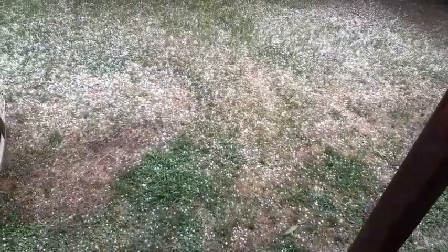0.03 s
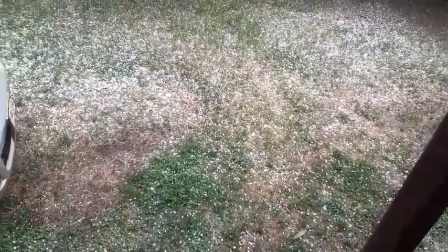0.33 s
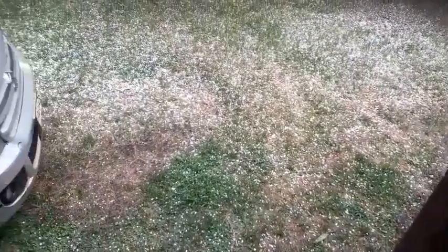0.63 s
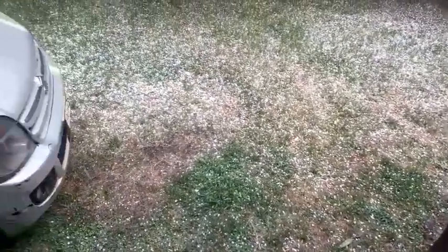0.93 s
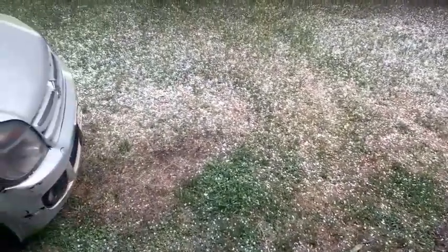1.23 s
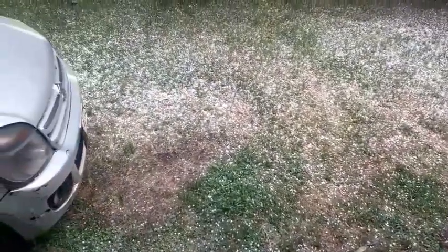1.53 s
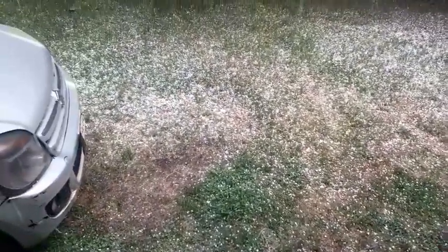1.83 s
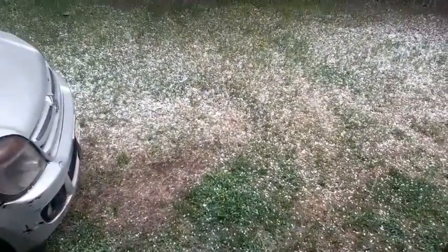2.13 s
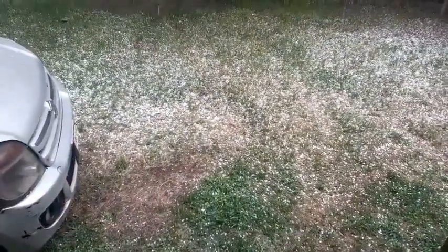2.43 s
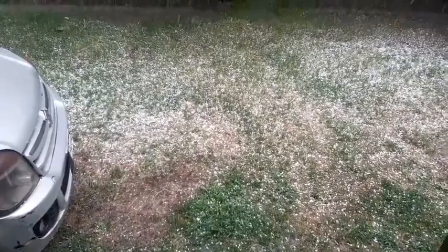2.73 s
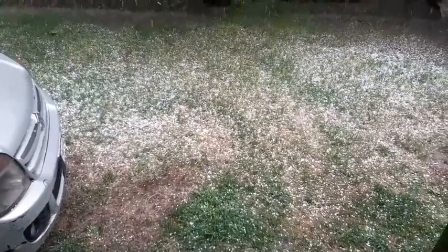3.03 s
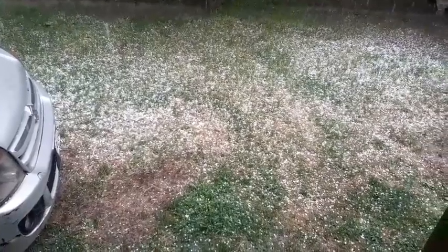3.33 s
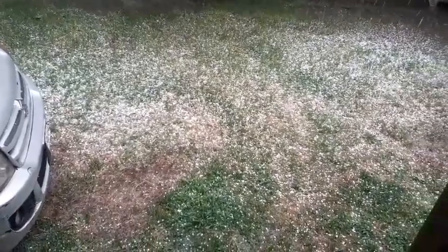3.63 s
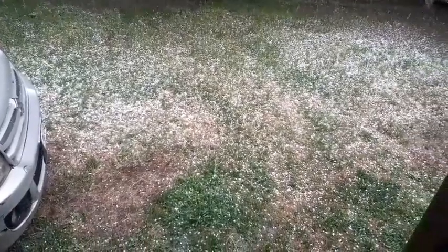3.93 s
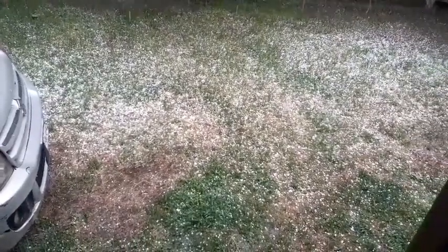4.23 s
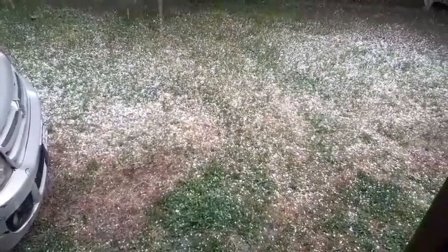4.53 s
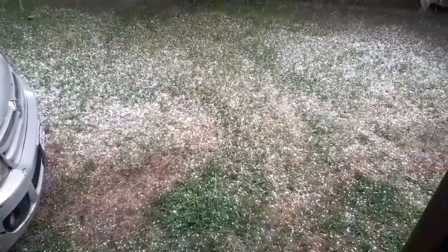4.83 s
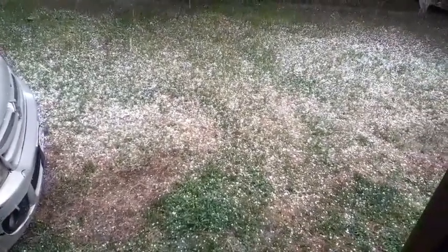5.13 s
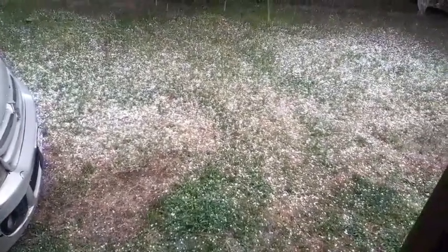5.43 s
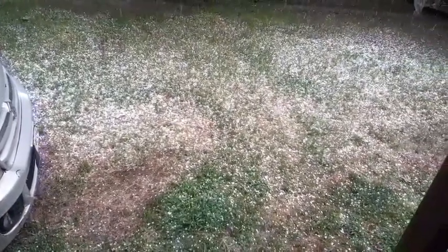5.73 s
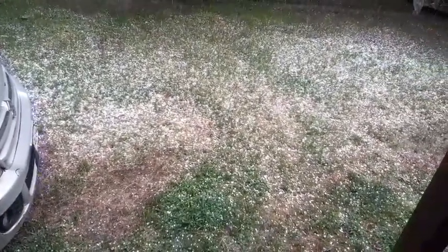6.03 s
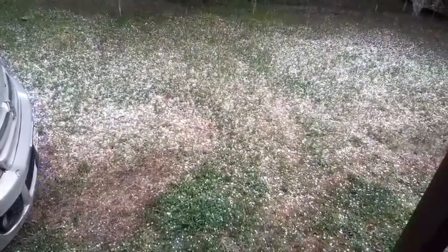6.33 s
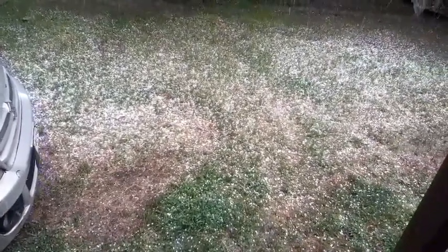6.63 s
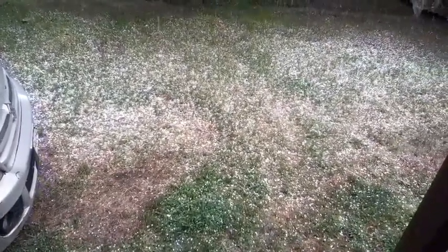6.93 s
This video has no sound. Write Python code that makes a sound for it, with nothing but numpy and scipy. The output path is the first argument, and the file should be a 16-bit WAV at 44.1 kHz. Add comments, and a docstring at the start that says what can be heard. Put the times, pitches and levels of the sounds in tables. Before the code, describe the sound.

Hail and rain pour on a grassy yard in a dense, steady roar, heard from under an open shelter beside a parked car. Small stones drum on the roof, and ice ticks and clinks on the ground and car. Big stones hit overhead with hollow knocks and gritty crashes for three seconds, pause briefly, land in a second bunch, thin out, then return near the end.

```python
"""Hail and rain pour on a yard and on the roof of an open shelter beside a parked car.
From the start, countless far stones merge into a roar while nearer ones drum, tick and clink.
For three seconds big stones keep hitting the roof: whole ones knock hollowly, others burst with a crash.
After a short lull a second bunch lands. The big hits thin out after five seconds,
then a last bunch falls near the end, at about seven seconds."""
import sys
import numpy as np
from scipy import signal
from scipy.io import wavfile
from scipy.ndimage import uniform_filter1d

SR = 44100
rng = np.random.default_rng(int(sys.argv[2]) if len(sys.argv) > 2 else 0)


def int16_out(signal):
    """Quantize to a 16-bit WAV file."""
    q = np.round(np.clip(np.atleast_2d(signal).T, -1, 1) * 32767)
    wavfile.write(sys.argv[1], SR, q.astype(np.int16))


N = 312669

# Levels are relative. pan is left minus right; t60 is the time a ring takes to fade by 60 dB.
# how strong each sound is from low to high: f/Hz, level/dB
ROAR_TONE = [(20, -54), (70, -27), (125, -10.5), (165, -11), (260, -5), (410, -8.5), (540, -2.5),
             (680, -3.5), (790, -0.5), (1130, -3.5), (1420, -2), (1750, -4.4), (2400, -6), (3250, -10.5),
             (3800, -10.5), (5400, -14), (6700, -14), (7400, -15.5), (9200, -18), (12300, -18),
             (15500, -29)]
DRUM_TONE = [(30, -54), (100, -24), (260, -8), (400, -10.5), (550, -4), (770, -1), (900, 0.5), (1100, -7.5),
             (2300, -11.5), (4000, -18), (9000, -36), (15000, -41)]
ICE_TONE = [(500, -14), (2000, -5), (4000, -5.5), (7000, 3), (9000, -0.5), (12500, 1), (15500, -9)]
CRASH_TONE = [(200, -18), (900, 4.5), (2000, -0.5), (2900, 5), (3700, 0), (4500, -2), (5600, -2),
              (7000, -3), (9200, -10), (12500, -10), (15500, -22)]
THUD_TONE = [(50, -29), (130, -6), (280, -4), (420, -3.5), (700, -6), (1500, -2), (4000, -46)]
# how alike the roar is on the left and right: f/Hz, likeness (1 or more means the same)
ROAR_LIKENESS = [(60, 1.5), (130, 1), (290, 0.95), (640, 0.77), (1000, 0), (1410, -0.5), (2200, 0.5),
                 (3100, -0.06), (6800, 0)]
# which side the roar leans to: f/Hz, pan/dB
ROAR_PAN = [(60, -1.0), (110, -0.5), (200, -0.5), (380, -1.4), (700, 1.5), (1290, 0), (2380, -0.5),
            (4400, -3), (8120, -2.0), (15000, 0)]
# slow swell of the roof's drumming and of the yard's hiss: t/s, level/dB
ROOF_SWELL = [(0, 3), (0.4, 0.5), (0.85, -0.5), (1.35, 1), (1.8, -1.3), (2.25, -0.5), (3.2, -1),
              (3.95, 0.6), (4.35, -0.5), (4.6, 1.5), (4.8, -0.5), (5.35, 0.5), (5.8, 0.3), (6.1, 0),
              (6.5, 1.5), (7.09, 0.3)]
YARD_SWELL = [(0, 0.021), (1.3, 0.073), (1.85, -0.3), (2.2, 0.063), (3.2, -0.69), (4.3, 0.39), (4.7, -0.19),
              (5.5, -0.1), (6.15, 0.52), (7.09, -0.73)]
# sharp ticks of ice close by: t/s, level/dB, pan/dB
TICK_HITS = [(0.002, -12, 0), (0.183, -18, -6), (0.457, -15, -4), (0.587, -14, -3), (0.622, -17, -2),
             (0.666, -17, -3), (0.719, -17, -2), (0.801, -18, -7), (0.857, -17, -5), (0.975, -20, -4),
             (1.148, -17, -4), (1.402, -17, -2), (1.912, -17, -6), (2.057, -21, -2), (2.15, -18, 5),
             (2.446, -16, -2), (2.818, -13, -10), (3.523, -15, 0), (3.744, -19, -2), (3.804, -15, -3),
             (4.341, -15, -4), (5.815, -20, -7), (5.947, -13.5, -4), (6.111, -15, -1), (6.201, -14, -5),
             (6.252, -14, -3), (6.689, -17, 2), (6.947, -21, -3), (6.983, -14, -4)]
# stones that ring with a note: t/s, level/dB, f/Hz, pan/dB
PING_HITS = [(0.062, -8, 1940, -2), (0.063, -15, 2440, 3), (0.312, -15, 1695, -7), (0.453, -17, 2040, -4),
             (0.496, -9.5, 1600, -8), (0.591, -18, 1588, -4), (0.800, -22, 3014, -12),
             (0.853, -16, 1815, -2), (0.981, -15, 1750, -2), (1.013, -11, 2020, 0), (1.068, -8, 1501, -3),
             (1.069, -18, 3321, -4), (1.147, -19, 5800, 1), (1.681, -11, 2020, 6), (1.683, -19, 4931, -9),
             (1.705, -20, 6756, -7), (2.456, -15, 1222, -6), (2.482, -14, 1380, -2), (2.597, -17, 1950, 0),
             (2.612, -12, 2580, -4), (2.802, -14.5, 2010, -14), (2.818, -12, 2917, -3),
             (3.818, -12, 1720, -5), (4.098, -7, 1650, -3), (4.542, -13, 1291, -3), (4.625, -13, 1668, -6),
             (4.698, -14, 2170, -12), (4.795, -15, 2100, 1), (4.855, -15, 1320, 0), (4.904, -11, 1860, -6),
             (5.028, -13.5, 2030, -9), (5.51, -16, 3500, 0), (5.795, -14, 1216, -5),
             (5.814, -19, 6368, -10), (5.947, -21, 6450, -12), (6.571, -18, 3757, -12),
             (6.628, -16, 1911, -3), (6.680, -20, 1738, -1), (6.792, -12, 1430, 0), (6.961, -12, 1750, 6)]
# hollow knocks and deep thumps on the roof panels: t/s, level/dB, f/Hz
KNOCK_HITS = [(0.001, -20, 285), (0.096, -16, 770), (0.196, -14, 786), (0.312, -17, 873), (0.385, -12, 900),
              (0.495, -18, 620), (0.602, -8, 681), (0.995, -22, 236), (1.030, -12, 765),
              (1.400, -12.5, 942), (2.064, -19, 258), (2.446, -7.5, 766), (2.479, -19, 931),
              (2.734, -14, 848), (3.537, -13, 780), (3.924, -13, 870), (3.957, -23, 339), (3.985, -17, 870),
              (4.100, -11, 655), (4.508, -12, 760), (4.526, -9, 686), (4.558, -17, 285), (4.587, -17, 360),
              (4.590, -20, 904), (4.610, -15, 746), (4.616, -14, 350), (4.627, -16, 764), (4.647, -20, 678),
              (4.738, -23, 263), (5.367, -16.5, 285), (5.443, -22, 232), (5.745, -14, 790),
              (5.892, -17.5, 298), (6.482, -13, 870), (6.59, -15, 590), (6.63, -16, 946), (6.638, -19, 294),
              (6.762, -15, 650), (6.977, -21, 296)]
# big stones on the roof: t/s, level/dB, thud against crash/dB, pan/dB, time for the pieces to land/s,
# clack level/dB, clack f/Hz
BIG_HITS = [(0.318, -17, -6, 0, .002, -22, 3140), (0.381, -18, 2, -4, .003, -30, 3600),
            (0.492, -19.5, 2, -2, .001, -24, 3482), (0.587, -15.5, -9, -1, .0025, -24, 3460),
            (0.664, -19.5, -3, -6, .0015, -24, 3779), (0.85, -18.5, 0, -2, .002, -30, 3520),
            (0.973, -13, -6, -2.5, 0.0023, -15.5, 3520), (1.127, -18, -11, -3, .002, -22, 3520),
            (1.399, -19.5, -2, -6, .003, -29, 3580), (1.585, -16.5, -10, -3.5, .0036, -26, 3300),
            (1.635, -17, -9, -2, .004, -27, 3100), (1.702, -17, 1, -2, 0.0022, -29, 2971),
            (2.055, -14.5, -2.5, -3, .002, -20, 3601), (2.15, -18, -12, 0, .001, -27, 2987),
            (2.444, -15, -7, -1, .0015, -18, 3560), (2.476, -17.5, 2.5, -3, .002, -26, 3370),
            (2.816, -13.5, -17, -3, .0016, -18, 3466), (3.561, -18, -5, -3, .0028, -22, 3680),
            (3.742, -18.5, 1, 1, .0015, -26, 3500), (3.803, -20, -7, -5, .002, -28, 3300),
            (3.922, -17, -1, 0, .002, -18, 3050), (4.005, -16, -4, -4, .002, -33, 3600),
            (4.137, -15, -12, -1, .003, -22, 3316), (4.507, -13.5, -2.5, -2, 0.0029, -19, 3480),
            (4.585, -22, 3, -3, .003, -28, 3470), (4.853, -17, -3, -3, .0015, -29, 3300),
            (5.946, -18.5, -9, -1, .001, -32, 3470), (6.587, -14, -7, -3.5, 0.0027, -20, 3900),
            (6.658, -14.5, -15, -4, .002, -23, 4000), (6.949, -12.5, -6, -1, 0.0045, -22, 3040)]
# the tones (modes) of a clink, a roof panel and the roof sheet: multiple of the pitch, level/dB, t60/s
CLINK_MODES = [(1, -2, 0.087), (1.13, -6, 0.054), (1.33, -4.5, 0.031), (1.9, -12, .025)]
PANEL_MODES = [(0.87, -9, .14), (1, -3, 0.12), (1.3, -18, .04), (1.85, -16, 0.093)]
SHEET_MODES = [(0.55, -8, .1), (0.86, -6, 0.12), (1, 1, 0.14), (1.08, -1.5, .14), (1.19, -4.5, 0.11),
               (1.68, -10, .09), (1.95, -6, .09)]
# the level dips briefly: t/s, depth/dB, half-width/s
LEVEL_DIPS = [(1.754, 2, 0.032), (2.856, 3, 0.025), (5.98, 3.5, 0.021)]


def gain_of(db):
    """Turns decibels into a number to multiply by."""
    return 10 ** (np.asarray(db) / 20)


def evened(x):
    """Scales a signal to an average strength (rms) of 1."""
    return x / np.sqrt(np.mean(x ** 2) + 1e-20)


def read(points, hz):
    """Looks up a table between its rows, giving each octave equal room."""
    f, value = np.transpose(points)
    return np.interp(np.log(hz + 1), np.log(f + 1), value)


def add(mix, start_s, sound):
    """Mixes a stereo sound in at the given time."""
    part = mix[:, max(round(start_s * SR), 0):][:, :sound.shape[1]]
    part += sound[:, :part.shape[1]]


def panned(pan_db):
    """Left and right gains; above 0 dB the left is louder."""
    return gain_of([[pan_db / 2], [-pan_db / 2]])


def coloured(x, points, size=2048):
    """Shapes the tone with a filter that rings only after a click, so the click starts sharply."""
    log_gain = np.log(gain_of(read(points, abs(np.fft.fftfreq(size, 1 / SR)))))
    response = np.exp(np.conj(signal.hilbert(log_gain)))
    taps = np.fft.ifft(response).real[:size // 2]
    return signal.oaconvolve(x, taps[None] / np.linalg.norm(taps), axes=1)[:, :x.shape[1]]


def centred_bass(x, corner_hz=430):
    """Low sounds have long waves, which reach both microphones alike."""
    mid, side = (x[0] + x[1]) / 2, (x[0] - x[1]) / 2
    side = signal.sosfilt(signal.butter(1, corner_hz, "high", fs=SR, output="sos"), side)
    return np.array([mid + side, mid - side])


def ringing(t60, length_s=.25, rise_s=0.0039):
    """Many tones and echoes blur into stereo noise that builds up quickly and dies away."""
    t = np.arange(int(length_s * SR)) / SR
    return rng.standard_normal((2, len(t))) * (1 - np.exp(-t / rise_s)) * gain_of(-60 * t / t60)


def pitched(ring, hz, sharpness=4):
    """Gives a noisy ring one note and keeps its strength."""
    b, a = signal.iirpeak(hz, sharpness, fs=SR)
    return evened(signal.lfilter(b, a, ring)) * np.std(ring)


def struck(modes, hz, rise_s, phase_spread, length_s=.16):
    """A struck object rings with a few fading tones, out of step at the two microphones."""
    t = np.arange(int(length_s * SR)) / SR
    ratio, mode_db, t60 = np.transpose(modes)[:, :, None]
    phase = 2 * np.pi * rng.random(ratio.shape) + phase_spread * rng.standard_normal((2, len(modes), 1))
    fade = (1 - np.exp(-t / rise_s)) * gain_of(mode_db - 60 * t / t60)
    return (fade * np.sin(2 * np.pi * hz * ratio * t + phase)).sum(1)


def clink(hz, tone_db=-2.5, echo_db=-5, length_s=.07):
    """One stone rings on its own note, and the shelter echoes the note."""
    tone = struck(CLINK_MODES, hz, rise_s=0.0016, phase_spread=1.6, length_s=length_s)
    echo = pitched(ringing(t60=0.066, length_s=length_s), hz)
    return gain_of(tone_db) * tone + gain_of(echo_db) * echo


def impacts(per_s, spread_db, ring_t60, echo_gain, echo_t60, patches=24, max_lag=20):
    """Stones land at random on patches all around; each patch has its own ring, direction and echo."""
    out = np.zeros((2, N))
    strength = gain_of(spread_db * np.minimum(rng.exponential(1, N), 3))
    blows = strength * (rng.random(N) < per_s / SR)
    patch = rng.integers(0, patches, N)
    for k, lag in enumerate(np.linspace(-max_lag, max_lag, patches).round().astype(int)):
        ring = evened(ringing(ring_t60)[0])
        # the sound reaches the farther microphone a few samples later
        direct = np.array([np.pad(ring, (max(side * lag, 0), max_lag))[:len(ring)] for side in (1, -1)])
        echo = echo_gain * evened(ringing(echo_t60))
        out += signal.oaconvolve((blows * (patch == k))[None], direct + echo, axes=1)[:, :N]
    return out


def swell(curve, t):
    """The shower slowly grows and eases, in dB."""
    return np.interp(t, *np.transpose(curve))


def flurries(t, depth_db):
    """Quick random swells of the hail, 4 to 18 a second, in dB."""
    waves = (np.sin(2 * np.pi * (hz * t + rng.random())) / np.sqrt(hz) for hz in np.geomspace(4, 18, 20))
    return depth_db * evened(sum(waves))


def far_roar(level_db=-17.0, patchy_db=1.22, flicker_db=.5, size=1024):
    """Far hail and rain merge into noise that swells and flickers with the shower."""
    hop = size // 4
    frames, hz = N // hop + 5, np.fft.rfftfreq(size, 1 / SR)
    t = np.arange(frames)[:, None] * hop / SR
    # random values for every moment and frequency
    *noise, patches = np.moveaxis(rng.standard_normal((frames, len(hz), 5)), -1, 0)
    patches = evened(uniform_filter1d(uniform_filter1d(patches, size=7, axis=0), size=30, axis=1))
    flicker = evened(uniform_filter1d(rng.standard_normal(frames), size=6))[:, None]
    # the lows follow the roof, the highs follow the yard
    low_db = 0.52 * swell(ROOF_SWELL, t)
    high_db = 0.68 * swell(YARD_SWELL, t) + flurries(t, depth_db=0.64) + flicker_db * flicker
    treble = read([(900, 0.11), (3000, 1)], hz)
    swell_db = (1 - treble) * low_db + treble * high_db
    likeness = np.clip(read(ROAR_LIKENESS, hz), -1, 1)
    left = noise[0] + 1j * noise[1]
    right = likeness * left + np.sqrt(1 - likeness ** 2) * (noise[2] + 1j * noise[3])
    spectrum = np.array([left, right]) * gain_of(read(ROAR_TONE, hz) + swell_db + patchy_db * patches)
    spectrum *= gain_of(np.array([1, -1])[:, None, None] * read(ROAR_PAN, hz) / 2)
    _, roar = signal.istft(spectrum.swapaxes(1, 2), nperseg=size, noverlap=size - hop)
    return gain_of(level_db) * evened(roar[:, :N])


def ice_patter(level_db=-30, pan_db=-0.5):
    """Grains of ice click on the ground and on the car."""
    clicks = impacts(per_s=240, spread_db=4.5, ring_t60=0.013, echo_gain=1.6, echo_t60=0.16)
    t = np.arange(N) / SR
    swell_db = 1.3 * swell(YARD_SWELL, t) + flurries(t, depth_db=1.5)
    return gain_of(level_db + swell_db) * panned(pan_db) * evened(coloured(clicks, ICE_TONE))


def roof_drumming(level_db=-22.5, pan_db=-1.5):
    """Small stones clatter on the roof, hundreds a second."""
    taps = impacts(per_s=800, spread_db=3.5, ring_t60=0.015, echo_gain=0.94, echo_t60=0.15)
    drumming = evened(centred_bass(coloured(taps, DRUM_TONE)))
    swell_db = 1.2 * swell(ROOF_SWELL, np.arange(N) / SR)
    return gain_of(level_db + swell_db) * panned(pan_db) * drumming


def pellets(level_db=-27, per_s=190, low_hz=1300, high_hz=7200, pan_db=-3.5, scatter_db=4):
    """Medium stones clink at random; smaller ones ring higher and more softly."""
    out = np.zeros((2, N))
    for when, smallness, force, side in rng.random((int(per_s * N / SR), 4)):
        blow_db = 0.5 * min(-np.log(1 - force), 2) - 4 * smallness
        ring = clink(low_hz * (high_hz / low_hz) ** smallness)
        add(out, when * N / SR, gain_of(blow_db) * panned(pan_db + scatter_db * (2 * side - 1)) * ring)
    return gain_of(level_db + swell(YARD_SWELL, np.arange(N) / SR)) * evened(out)


def near_ticks(snap_db=4, echo_db=-3):
    """Single stones snap on something hard close by, mostly to the right."""
    out = np.zeros((2, N))
    for start_s, db, pan_db in TICK_HITS:
        tick = gain_of(snap_db) * ringing(t60=0.023) + gain_of(echo_db) * ringing(t60=0.1)
        add(out, start_s, gain_of(db) * panned(pan_db) * tick)
    return coloured(out, ICE_TONE)


def pings():
    """Heavier stones clank on the roof and the car, each on its own note."""
    out = np.zeros((2, N))
    for start_s, db, hz, pan_db in PING_HITS:
        add(out, start_s, gain_of(db) * panned(pan_db) * clink(hz))
    return out


def hollow_knocks(echo_db=-9):
    """A stone that stays whole knocks a roof panel; its low tones ring and the shelter echoes them."""
    out = np.zeros((2, N))
    for start_s, db, hz in KNOCK_HITS:
        knock = struck(PANEL_MODES, hz, rise_s=.001, phase_spread=.3)
        echo = centred_bass(pitched(ringing(t60=.15), hz))
        add(out, start_s, gain_of(db) * knock)
        add(out, start_s, gain_of(db + echo_db) * echo)
    return out


def sheet_clacks(pan_shift_db=-3):
    """The roof sheet clacks under each big stone; the landing spot sets the pitch."""
    out = np.zeros((2, N))
    for start_s, _, _, pan_db, _, clack_db, hz in BIG_HITS:
        clack = struck(SHEET_MODES, hz, rise_s=0.002, phase_spread=1.6)
        add(out, start_s, gain_of(clack_db) * panned(pan_db + pan_shift_db) * clack)
    return out


def big_stones(crash_db=-0.3, crack_db=-3, crack_t60=0.011, usual_db=-16.5, usual_t60=0.21):
    """Each big stone cracks, thumps the roof and bursts with a gritty crash that the shelter spreads."""
    crash, thud = np.zeros((2, N)), np.zeros((2, N))
    t = np.arange(SR // 3) / SR
    for start_s, db, thud_db, pan_db, rise_s, _, _ in BIG_HITS:
        t60 = usual_t60 * 2 ** ((db - usual_db) / 5.5)  # a stone 5.5 dB louder rings twice as long
        crack = gain_of(crack_db - 60 * t / crack_t60)
        fade = gain_of(db) * (1 - np.exp(-t / rise_s)) * (crack + gain_of(-60 * t / t60))
        grit_db = -evened(uniform_filter1d(rng.standard_normal(len(t)), size=40))
        add(crash, start_s, fade * gain_of(grit_db) * panned(pan_db) * rng.standard_normal((2, len(t))))
        add(thud, start_s, fade * gain_of(thud_db) * rng.standard_normal((2, len(t))))
    thud = centred_bass(coloured(thud, THUD_TONE), corner_hz=900)
    return gain_of(crash_db) * coloured(crash, CRASH_TONE) + thud


def scene():
    """The steady downpour with the separate hits on top."""
    downpour = far_roar() + roof_drumming() + ice_patter()
    return downpour + big_stones() + pings() + near_ticks() + pellets() + sheet_clacks() + hollow_knocks()


def record(dry, bass_hz=50, ceiling=.88, top_hz=15450):
    """The level dips briefly, the microphone loses deep bass, peaks are rounded, top treble is cut."""
    t = np.arange(N) / SR
    dip_db = sum(depth_db * np.exp(-((t - at_s) / width_s) ** 2) for at_s, depth_db, width_s in LEVEL_DIPS)
    bass_cut = signal.butter(2, bass_hz, "high", fs=SR, output="sos")
    thinned = signal.sosfilt(bass_cut, dry * gain_of(-dip_db))
    rounded = thinned / (1 + (thinned / ceiling) ** 8) ** (1 / 8)
    treble_cut = signal.firwin(301, top_hz, window=("kaiser", 9), fs=SR)
    return signal.oaconvolve(rounded, treble_cut[None], "same")


dry = scene()
out = record(dry)
int16_out(out)
```